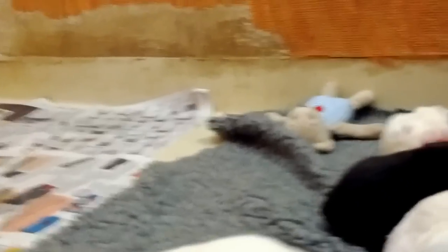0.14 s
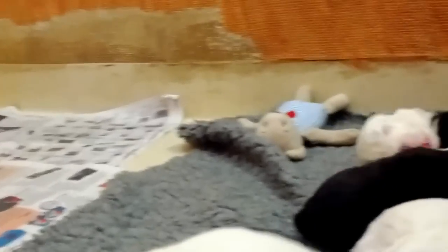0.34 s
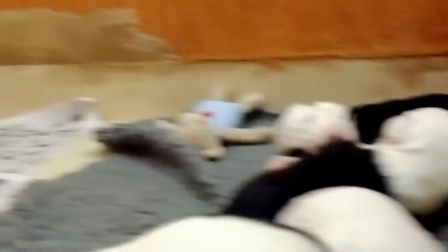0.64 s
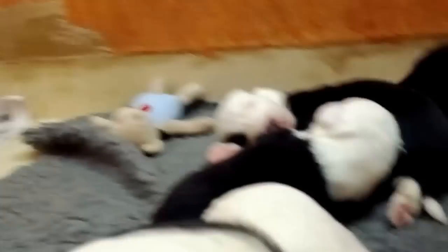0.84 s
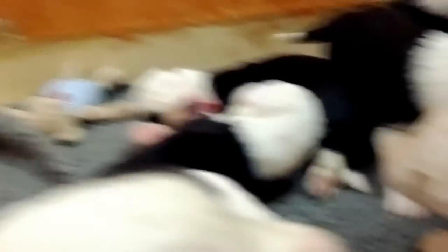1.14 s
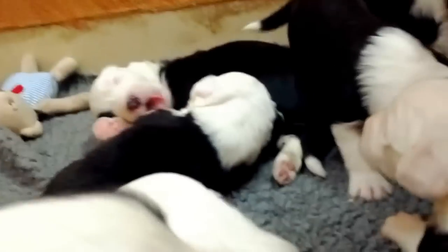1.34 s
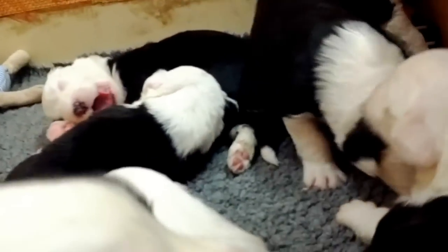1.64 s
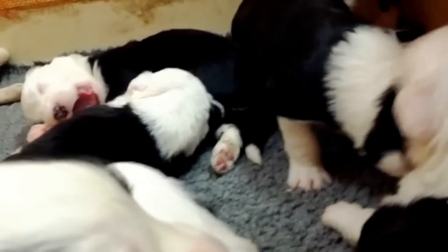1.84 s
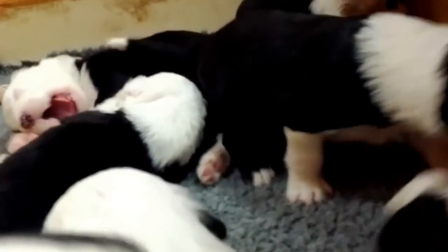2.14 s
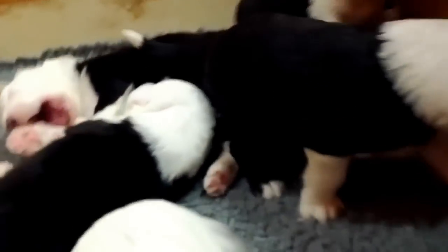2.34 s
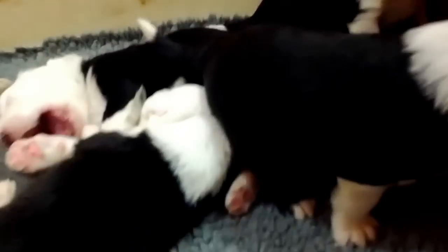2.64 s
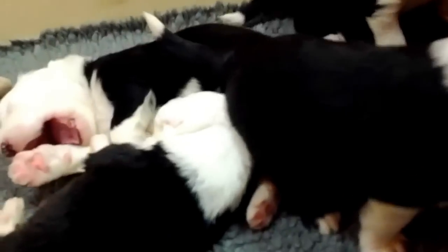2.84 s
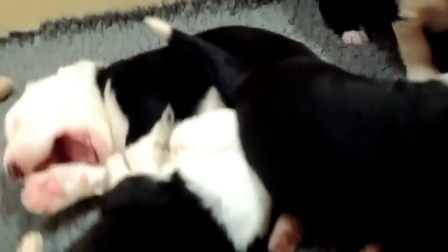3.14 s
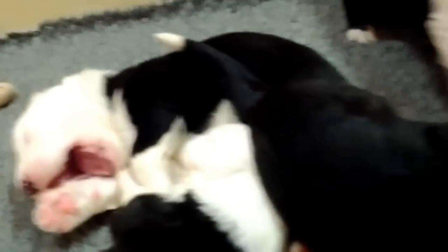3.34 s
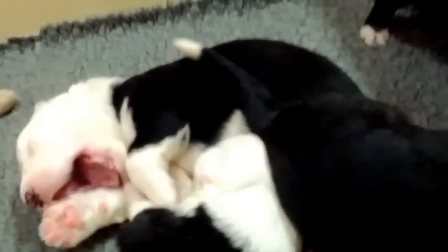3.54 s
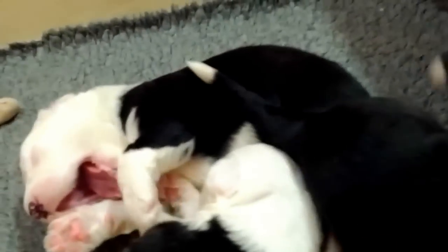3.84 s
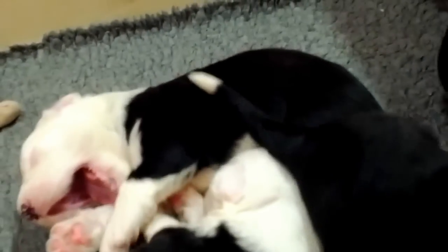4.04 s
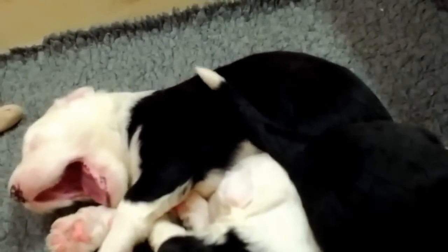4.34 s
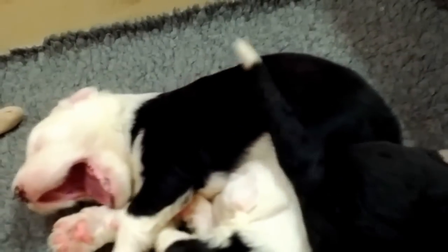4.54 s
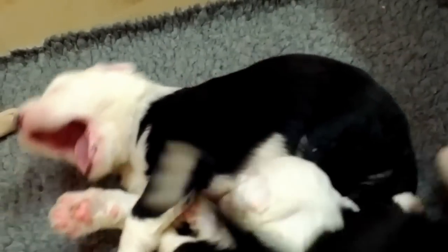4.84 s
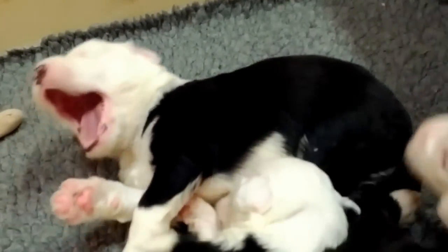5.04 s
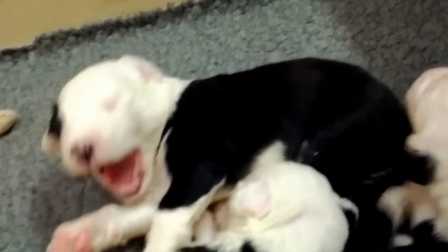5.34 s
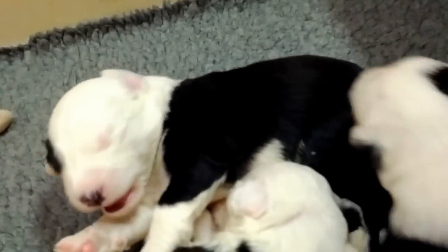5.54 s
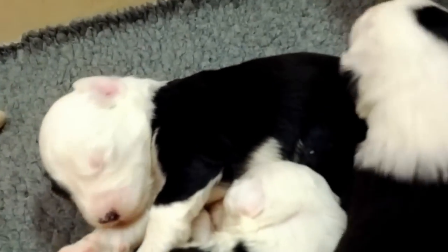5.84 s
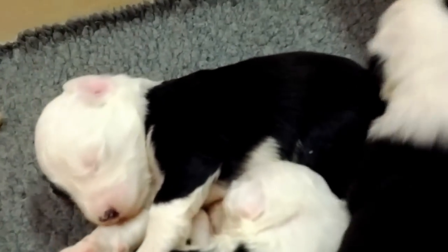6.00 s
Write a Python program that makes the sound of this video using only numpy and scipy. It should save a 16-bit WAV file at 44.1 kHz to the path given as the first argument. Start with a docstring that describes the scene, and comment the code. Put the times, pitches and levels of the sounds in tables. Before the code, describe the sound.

Close rustling of fleece and fur, padded bumps and ticking claws, a faint low groan, a sharp dry tap, then small metallic clinks and scraping.

```python
"""Puppies stirring in a pen

Puppies shuffle on fleece bedding in a small room, close to a handheld microphone.
Shaped noise makes fur and fleece rustle and scuff; noisy blows and soft pushes ring the pen and floor
as paws knock and thud. Claws tick in short crackles, and light metal clinks and rattles as decaying sines
while something scrapes along the side. A hard tap, a faint groan, a toned hiss and room noise join in.
"""
import sys
import numpy as np
from scipy import signal
from scipy.fft import rfft, irfft
from scipy.io import wavfile

SR = 44100
rng = np.random.default_rng(int(sys.argv[2]) if len(sys.argv) > 2 else 0)


def output_pcm(signal):
    """Save a mono or channel-first signal as 16-bit PCM at the path in sys.argv[1].

    Samples are clipped to [-1, 1] before scaling.
    """
    pcm = np.clip(np.atleast_2d(signal).T, -1, 1) * 32767
    wavfile.write(sys.argv[1], SR, np.round(pcm).astype(np.int16))


N = 272097
T = np.arange(N) / SR
RING_T = T[:SR // 2]  # half a second, for the struck sounds

# damped modes of the light metal: (frequency [Hz], relative level [dB], 60 dB decay time [s])
METAL_MODES = [(3090, -8, 0.04), (3273, -1.5, 0.05), (3380, -6, 0.023), (3348, -3, 0.032),
               (3400, -15, 0.072), (4040, -8, 0.05), (4870, -5, 0.032), (5290, -9, 0.064),
               (5970, -9, 0.027), (6030, -7.5, 0.1), (6120, -10, 0.038), (6800, -13.5, 0.09),
               (6880, -15, 0.096), (8540, -5.5, 0.054), (8700, -6, 0.087), (10300, -11, 0.04),
               (9560, 3.5, 0.019), (12470, 4.5, 0.019), (13700, -1, 0.023), (15000, -16, .04),
               (14900, -15, .03)]


def undb(db):
    """Turn decibels into a gain."""
    return 10 ** (np.asarray(db) / 20)


def unit(x):
    """Scale to rms 1."""
    return x / np.sqrt(np.mean(x ** 2))


def colour(x, points):
    """Shape the spectrum of x by (frequency [Hz], level [dB]) points, then scale to rms 1."""
    hz, db = np.transpose(points)
    f = np.maximum(np.fft.rfftfreq(len(x), 1 / SR), 1)
    gain = undb(np.interp(np.log(f), np.log(hz), db))
    return unit(irfft(rfft(x) * gain, len(x)))


def resonate(x, hz, width):
    """Pass x through one resonance with gain 1 at its centre."""
    sharpness = max(hz / width, 2.5 * hz / SR)  # keeps the width below the filter's limit
    b, a = signal.iirpeak(hz, sharpness, SR)
    return signal.lfilter(b, a, x)


def walk(rate):
    """Wander at random, in straight lines between `rate` random points per second."""
    knots = rng.standard_normal(N)
    return np.interp(T * rate, np.arange(N), knots)


def grains(spread_db):
    """Make dense tiny slips whose sizes differ from one millisecond to the next."""
    sizes = np.repeat(rng.standard_normal(N), SR // 1000)[:N]
    return rng.standard_normal(N) * undb(spread_db * sizes)


def fade(t60):
    """Die away exponentially, 60 dB down after t60 seconds."""
    return np.exp(-np.log(1000) * RING_T / t60)


def ring(modes):
    """Sum the decaying sines of a struck object; neighbouring modes start in opposite directions."""
    total = np.zeros(len(RING_T))
    for k, (hz, db, t60) in enumerate(modes):
        total += (-1) ** k * undb(db) * fade(t60) * np.sin(2 * np.pi * hz * RING_T)
    return total


def add(out, s, sound):
    """Mix a sound in at time s."""
    start = int(s * SR)
    out[start:start + len(sound)] += sound[:N - start]


def swell(peak_s, rise_s, fall_s):
    """A movement gathers speed and comes to rest again."""
    side_s = np.where(T < peak_s, rise_s, fall_s)
    return np.exp(-np.abs((T - peak_s) / side_s) ** 1.64)  # power 1 = pointed, 2 = bell


def held(rows, attack_s, t60):
    """Attack, hold and release a level for each (start [s], length [s], level [dB]) row."""
    level = np.zeros(N)
    for s, length, db in rows:
        attack = np.clip((T - s) / attack_s, 0, 1)
        release = np.exp(-np.log(1000) * np.maximum(T - s - length, 0) / t60)
        level += undb(db) * attack * release
    return level


def pen(force):
    """The sides of the pen answer a force with their resonances."""
    # resonances of the pen: (frequency [Hz], width [Hz], level [dB])
    resonances = [(177, 16, -1), (230, 75, 1.5), (288, 52, 0.5), (394.3, 35, 3.5), (505, 15.3, 4.5),
                  (584.6, 63, -0.5), (746, 50, -3.5), (940, 540, -13), (1143, 194, -8), (1430, 36, -6.5),
                  (1790, 150, -8), (2263, 61, -9.5), (2980, 1300, -5.5)]
    return sum(undb(db) * resonate(force, hz, width) for hz, width, db in resonances)


def bedding(fibre_db=1.5, scuff_db=1.5, flutter_db=3, hiss_trim_db=1, stir_wander_db=3.0, stir_rate=9):
    """Fibres slip with a bright hiss; the weight behind them scuffs and rumbles lower down."""
    # spectrum of slipping fibres: (frequency [Hz], level [dB])
    fibre_spectrum = [(600, -26), (1500, -24), (2500, -9.5), (4000, -2.5), (6000, -0.5), (9000, 0.5),
                      (13000, 4.5), (16000, 2.5)]
    # spectrum of the scuffing: (frequency [Hz], level [dB])
    scuff_spectrum = [(150, -5), (400, 5), (780, 6.5), (1000, 3.5), (1250, 2), (2200, -0.5), (4500, -4),
                      (9000, -23.5)]
    # spectrum of the shifting weight: (frequency [Hz], level [dB])
    rumble_spectrum = [(30, 0), (80, -3.5), (125, 5.5), (180, -7), (235, 1), (310, -7), (500, -23),
                       (1200, -69)]
    # bodies shifting on the fleece: (fastest moment [s], rise [s], fall [s],
    # hiss level before its trim [dB], scuff level before its flutter [dB], rumble level [dB])
    movements = [(0.04, 0.15, 0.14, -51, -53.5, -54), (0.26, 0.043, 0.13, -48.5, -52, -54),
                 (0.44, 0.074, 0.055, -68, -53.5, -58), (0.52, .04, 0.073, -45.5, -66, -60),
                 (0.645, 0.064, 0.073, -43.5, -48, -48), (0.81, 0.04, 0.088, -51, -59, -54),
                 (0.91, 0.043, 0.025, -53, -52.5, -53), (1.03, 0.093, 0.047, -51, -53.5, -45.5),
                 (1.19, 0.13, 0.096, -56.5, -59.5, -50.5), (1.331, 0.051, 0.1, -49.5, -48.5, -44),
                 (1.54, 0.09, 0.083, -46, -56, -52.5), (1.80, .1, 0.2, -54, -58, -53),
                 (2.21, 0.057, 0.078, -45.5, -48.5, -39), (2.40, 0.023, .04, -45.5, -49, -54),
                 (2.89, 0.057, 0.079, -45, -63, -59), (3.12, 0.07, 0.079, -46.5, -46, -55),
                 (3.42, 0.31, 0.31, -65.5, -77, -70), (3.69, 0.046, 0.04, -48, -56.5, -61),
                 (3.81, 0.064, 0.046, -43, -58.5, -55), (3.98, 0.22, 0.32, -56.5, -74, -75),
                 (4.37, 0.14, 0.027, -54.5, -73, -64), (4.6, 0.12, 0.12, -57.5, -61, -64),
                 (4.92, 0.15, 0.14, -57, -60.5, -66), (4.724, 0.053, 0.046, -37.5, -64, -70),
                 (5.11, 0.073, 0.15, -48, -65.5, -72), (5.31, 0.058, 0.12, -46, -54, -44.5),
                 (5.539, .05, 0.053, -37.5, -64, -59.5), (5.685, 0.019, 0.053, -46.5, -54.5, -49.5),
                 (6.03, 0.16, .12, -59, -67, -68), (6.158, .028, 0.0081, -37.5, -57, -63)]
    # the litter never lies quite still: levels of hiss, scuff and rumble in dB, before wander and trim
    stir = undb([-59.5, -65, -58.5])
    # powers add up, because the movements are unrelated
    power = np.outer(stir, undb(stir_wander_db * walk(stir_rate))) ** 2
    for s, rise, fall, *levels_db in movements:
        power = power + np.outer(undb(levels_db), swell(s, rise, fall)) ** 2
    slide, scuff, rumble = np.sqrt(power)
    hiss = colour(grains(fibre_db), fibre_spectrum) * slide * undb(hiss_trim_db)
    rub = colour(grains(scuff_db), scuff_spectrum) * scuff * undb(flutter_db * walk(40))
    weight = colour(rng.standard_normal(N), rumble_spectrum) * rumble
    return hiss + rub + weight


def knocks(breadth=1.11, onset_s=0.001, strike=0.5, direct_db=-18, padding=3.3):
    """A padded blow and its crumpling aftermath ring the pen; harder contact reaches higher resonances."""
    # paws and bodies knocking, and a few slow scuffs with long decays: (time [s], level [dB], centre frequency
    # [Hz], 60 dB decay of the force [s])
    blows = [(0.045, -47, 1090, 0.11), (0.236, -39.5, 905, 0.054), (0.25, -35.5, 1140, 0.03),
             (.361, -30.5, 1290, 0.015), (0.504, -35.5, 1400, 0.0098), (0.51, -24.5, 875, 0.015),
             (0.519, -31.5, 970, 0.028), (.597, -31, 720, 0.032), (0.599, -37.5, 199, 0.039),
             (0.745, -26.5, 199, 0.022), (.828, -52.5, 1340, 0.44), (1.029, -38.5, 1180, 0.18),
             (1.038, -36, 350, 0.15), (1.293, -44.5, 520, 0.37), (1.524, -40.5, 418, 0.065),
             (1.753, -38.5, 225, 0.051), (2.174, -25, 260, 0.037), (2.195, -29.5, 1520, 0.065),
             (2.200, -30.5, 260, 0.093), (2.379, -44.5, 840, 0.16), (2.620, -50.5, 1140, 0.35),
             (2.845, -34.5, 280, 0.23), (2.876, -39, 840, 0.14), (3.106, -25.5, 1830, 0.034),
             (3.122, -36.5, 1270, 0.14), (3.512, -44, 900, 0.025), (3.703, -29, 235, 0.082),
             (3.7041, -36.5, 700, 0.22), (5.173, -39, 780, 0.076), (5.190, -37.5, 433, 0.088),
             (5.28, -40, 1040, 0.13), (5.364, -28.5, 237, 0.051), (5.416, -32, 596, 0.16)]
    out = np.zeros(N)
    for s, db, hz, t60 in blows:
        crumple = rng.standard_normal(len(RING_T)) * fade(t60)
        force = crumple / np.linalg.norm(crumple) + signal.unit_impulse(len(RING_T)) * strike
        blow = pen(force) + undb(direct_db) * force
        for _ in range(2):
            blow = resonate(blow, hz, breadth * hz)
        # the soft paw takes off the top
        blow = signal.lfilter(*signal.butter(2, padding * hz, fs=SR), blow)
        # a longer ring holds more energy at the same level
        size = np.linalg.norm(fade(t60 + onset_s)) / np.linalg.norm(blow)
        add(out, s, undb(db) * blow * size)
    return out


def thuds():
    """A soft push rings the floor; a longer contact leaves only its lowest modes."""
    # weight dropping on the floor: (time [s], peak level [dB], contact time [s])
    drops = [(.658, -34, 0.0028), (0.744, -37.5, 0.0018), (1.043, -36, 0.0014), (1.309, -34, 0.0015),
             (2.019, -24, 0.0045), (2.143, -27, 0.0062), (2.175, -19, 0.0015), (2.184, -32, 0.0047),
             (2.193, -20, 0.0045), (3.80, -47.5, 0.0062), (4.968, -35.5, 0.0031), (5.286, -32, 0.0037),
             (5.364, -22.5, 0.0057), (5.393, -30, 0.0058), (5.413, -19.5, 0.0012), (5.672, -39.5, 0.0028)]
    # modes of the floor: (frequency [Hz], relative level [dB], 60 dB decay time [s])
    floor_modes = [(35, -41, 0.14), (75.9, 1.5, 0.26), (99.4, -9, 0.16), (129.3, -2, 0.13),
                   (179.8, -7, 0.25), (207, 0, 0.047), (266, -7, 0.082)]
    out, floor = np.zeros(N), ring(floor_modes)
    for s, db, contact in drops:
        push = np.sin(np.pi * RING_T[RING_T < contact] / contact)
        thud = signal.fftconvolve(floor, push)
        add(out, s, undb(db) * thud / np.abs(thud).max())
    return out


def ticks(centre_hz=8500, width_hz=16000, snap=0.098):
    """Claws snag and let go: a sharp snap, then a short broad crackle."""
    # claws catching, and at 2.003 s the bright top of the hard tap: (time [s], level at the start [dB], 60 dB
    # decay time of the crackle [s])
    snags = [(0.069, -38.5, 0.013), (0.208, -37.5, 0.043), (0.36, -31.5, 0.016), (.511, -40, 0.011),
             (0.519, -26, 0.039), (1.03, -33.5, 0.08), (1.44, -34, 0.037), (1.642, -32.5, 0.013),
             (2.003, -30, 0.009), (2.192, -33.5, 0.034), (2.259, -36.5, .04), (2.378, -38, 0.051),
             (2.392, -30, 0.051), (2.478, -39, 0.022), (2.541, -41.5, 0.03), (4.536, -48, 0.062),
             (4.976, -38, 0.025), (5.171, -39.5, 0.027), (5.285, -33.5, 0.14), (5.903, -40.5, 0.17)]
    out = np.zeros(N)
    for s, db, t60 in snags:
        shape = (fade(t60) + fade(snap * t60)) / 2
        crackle = unit(resonate(rng.standard_normal(len(RING_T)), centre_hz, width_hz))
        add(out, s, undb(db) * shape * crackle)
    return out


def clinks(clash_t60=0.052, crack_db=3, crack_t60=0.0079, body_db=-12, scatter_db=2, case_db=-25,
           favour_db=6, favour_octaves=0.14):
    """Metal contacts crack, clash and clang, leave two thin rings and draw a faint answer from the pen."""
    # metal touching metal: (time [s], strength of the contact [dB], lower ring level [dB],
    # upper ring level [dB], mode favoured by the point of contact [Hz])
    contacts = [(1.7527, -14, -33.5, -30, 6640), (1.785, -24.5, -60, -54, 3320),
                (1.8, -25.5, -60, -48, 6050), (1.804, -37, -63, -57, 6050), (2.783, -38.5, -51, -56, 12600),
                (2.866, -37, -46, -58, 3300), (2.968, -24, -51, -47, 4036), (2.982, -26.5, -54, -37, 4036),
                (3.006, -25.5, -45, -29, 4000), (3.03, -30, -33.5, -32, 4036), (3.09, -53, -38, -61, 5400),
                (3.107, -20.5, -36, -57, 3340), (3.133, -49, -30, -27, 9700), (3.146, -29, -40, -52, 3300),
                (3.2, -32, -43, -55, 3370)]
    # two long high rings: (frequency [Hz], relative level [dB], 60 dB decay time [s])
    long_rings = [(10664, 0, .2), (11770, 0, .18)]
    clash_spectrum = [(300, -19), (2000, -23), (3000, -6.5), (7000, 17.0), (11000, 6), (15000, 20.5)]
    out = np.zeros(N)
    shape = fade(clash_t60) + undb(crack_db) * fade(crack_t60)
    hz, base_db, t60 = np.transpose(METAL_MODES)
    for s, db, *rings_db, favoured_hz in contacts:
        clash = colour(rng.standard_normal(len(RING_T)), clash_spectrum) * shape / 2
        # the point of contact decides how strongly each mode answers
        nearness = np.exp(-(np.log2(hz / favoured_hz) / favour_octaves) ** 2)
        mode_db = base_db + favour_db * nearness + scatter_db * rng.standard_normal(len(hz))
        clang = ring(zip(hz, mode_db, t60))
        thin = sum(undb(ring_db) * ring([mode]) for ring_db, mode in zip(rings_db, long_rings))
        answer = colour(pen(rng.standard_normal(len(RING_T))), [(400, -1), (3000, -3)]) * fade(0.17)
        contact = clash + undb(body_db) * clang + undb(case_db) * answer
        add(out, s, undb(db) * contact + thin)
    return out


def drag(slip_hz=197, jitter=0.11, slip_db=3, grit_db=-3, buzz_db=-18):
    """Rough stick and slip, with grit between the slips, rings the pen and sets the metal buzzing."""
    # something dragged along the side of the pen: (start [s], length [s], level of the judder [dB])
    pulls = [(2.78, 0.015, -45), (2.838, 0.047, -34.5), (2.915, 0.029, -40.5), (2.99, 0.097, -49),
             (3.086, 0.043, -37)]
    turns = np.floor(np.cumsum(slip_hz * (1 + jitter * walk(150))) / SR)
    # one pulse each time the count of slips steps up
    slips = np.diff(turns, prepend=0) * undb(slip_db * rng.standard_normal(N))
    force = unit(slips) + undb(grit_db) * rng.standard_normal(N)
    judder_spectrum = [(180, -17.5), (300, 2.5), (600, -2.5), (1000, -9), (2000, -16.5), (5000, -32)]
    judder = colour(pen(force), judder_spectrum)
    rattle = signal.fftconvolve(force, ring(METAL_MODES))[:N]
    buzz = colour(rattle, [(3300, 4), (6000, -18), (15000, -12)])
    return (judder + undb(buzz_db) * buzz) * held(pulls, attack_s=0.0083, t60=0.22)


def tap():
    """A hard, dry contact right by the microphone dies within a few cycles."""
    # the one sharp tap: (time [s], peak level [dB])
    s, db = (2.004, -13)
    # its modes: (frequency [Hz], relative level [dB], 60 dB decay time [s])
    modes = [(550, -3.5, 0.033), (1130, -24, 0.021), (1123, 8, 0.015), (1690, 7, 0.004),
             (2280, 0.5, 0.0072), (4000, 8.5, 0.00081), (8800, -13, 0.00095), (13800, 2.5, 0.0039)]
    out, knock = np.zeros(N), ring(modes)
    add(out, s, undb(db) * knock / np.abs(knock).max())
    return out


def groan(waver=0.064, flutter_db=3):
    """A weak, unsteady sine tone sinks, rises and sinks again in pitch amid the shuffling."""
    # path of the groan: (time [s], pitch before waver [Hz], level before flutter [dB])
    path = [(.88, 254.8, -68), (.93, 236.3, -49.5), (1.0, 188, -42.5), (1.07, 177, -51), (1.12, 249.4, -51),
            (1.265, 226.6, -45), (1.35, 243.2, -49.5), (1.56, 233, -71)]
    s, hz, db = np.transpose(path)
    pitch = np.interp(T, s, hz) * (1 + waver * walk(59.7))
    size = np.interp(T, s, undb(db), left=0, right=0) * undb(flutter_db * walk(50.6))
    return size * np.sin(2 * np.pi * np.cumsum(pitch) / SR)


def wash():
    """An even hiss with a few faint pitches in it comes and goes."""
    # when it is heard: (start [s], length [s], level [dB])
    spells = [(3.17, 0.18, -54.5), (5.91, .26, -53.5)]
    # spectrum of the hiss: (frequency [Hz], level [dB])
    hiss_spectrum = [(120, -31), (300, 3), (600, -3.5), (930, -15.5), (1400, -5), (2100, -9), (4300, -7),
                     (7500, -19.5), (15000, -39)]
    # narrow resonances in it: (frequency [Hz], width [Hz], level before the spectrum is applied [dB])
    tones = [(1345, 43, 4), (3800, 49, 0), (4440, 34, -1), (4970, 72, 4)]
    noise = rng.standard_normal(N)
    toned = noise + sum(undb(db) * resonate(noise, hz, width) for hz, width, db in tones)
    return colour(toned, hiss_spectrum) * held(spells, attack_s=0.035, t60=0.72)


def reverberate(x, t60=0.28, wet_db=-14, gap_s=0.0088):
    """Nearby walls add a short diffuse tail after a brief gap."""
    tail = rng.standard_normal(len(RING_T)) * fade(t60) * (RING_T > gap_s)
    tail = tail / np.sqrt(np.sum(tail ** 2))
    return x + undb(wet_db) * signal.fftconvolve(x, tail)[:N]


def room(level_db=-53):
    """Steady noise, strongest in the bass, gives the quiet rumble and hiss of the room."""
    # spectrum of the room: (frequency [Hz], level [dB])
    room_spectrum = [(15, -4), (35, -0.5), (55, -11.5), (120, -7), (200, -21.5), (500, -20.5), (1000, -35),
                     (3000, -35.5), (7000, -46), (11000, -32), (15000, -24)]
    return colour(rng.standard_normal(N), room_spectrum) * undb(level_db)


def scene():
    """Mix all the stirring over the quiet room; knocks, ticks and clinks get the walls' tail."""
    quiet = room()
    contacts = reverberate(knocks() + ticks() + clinks())
    mix = contacts + bedding() + drag() + thuds() + tap() + groan() + wash() + quiet
    return mix[None]  # one channel


def record(dry, top_hz=15900):
    """A steep low-pass filter cuts the top."""
    low_pass = signal.ellip(10, 0.2, 70, top_hz, fs=SR, output="sos")
    return signal.sosfilt(low_pass, dry)


dry = scene()
out = record(dry)
output_pcm(out)
```